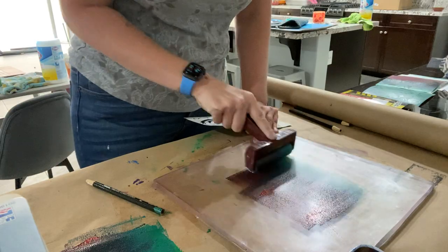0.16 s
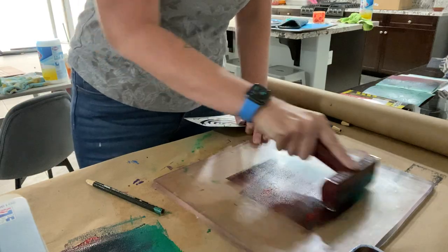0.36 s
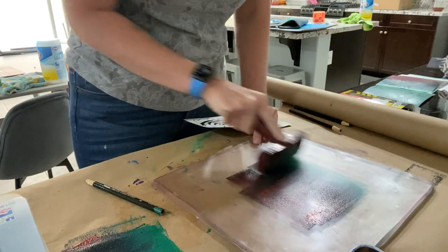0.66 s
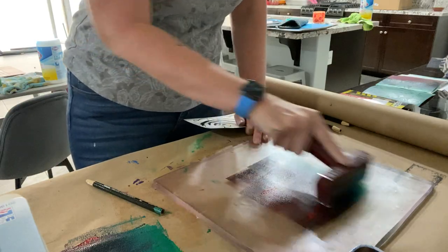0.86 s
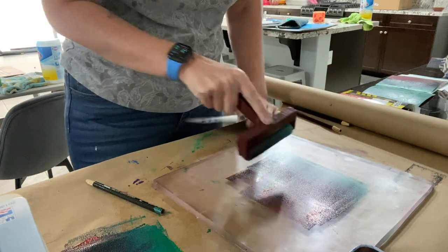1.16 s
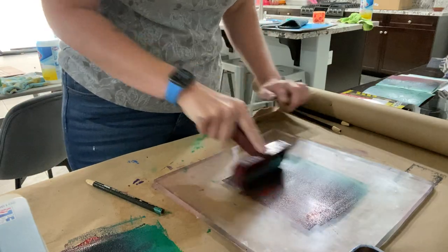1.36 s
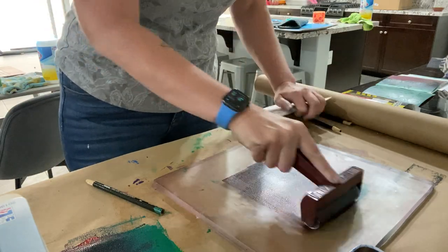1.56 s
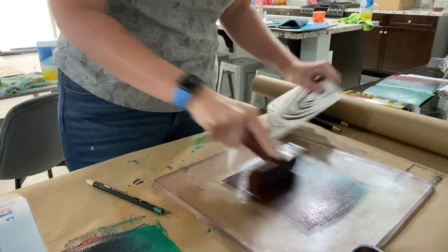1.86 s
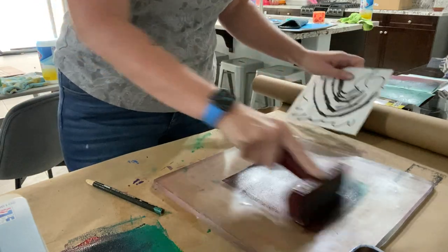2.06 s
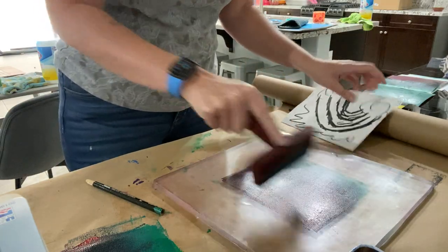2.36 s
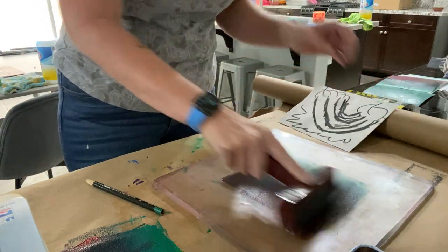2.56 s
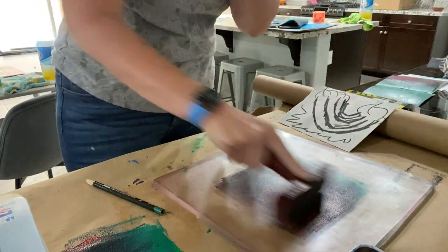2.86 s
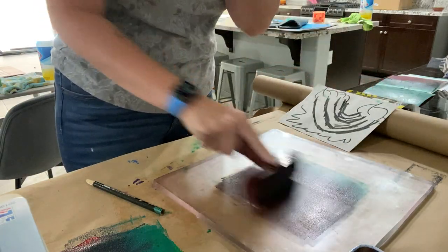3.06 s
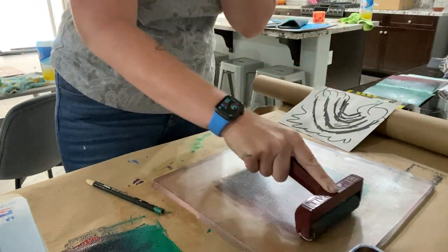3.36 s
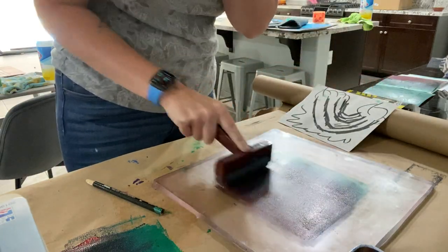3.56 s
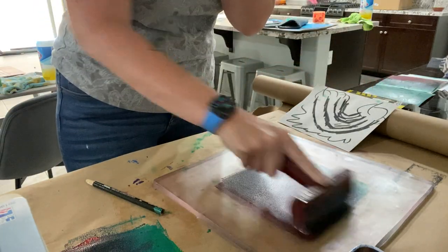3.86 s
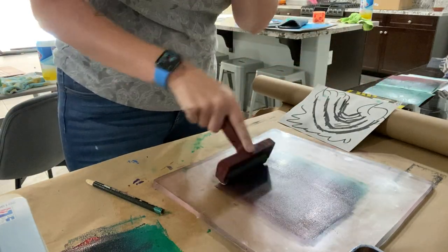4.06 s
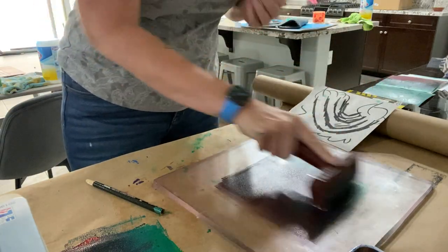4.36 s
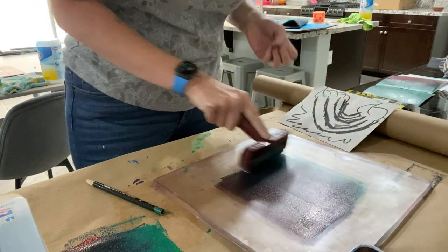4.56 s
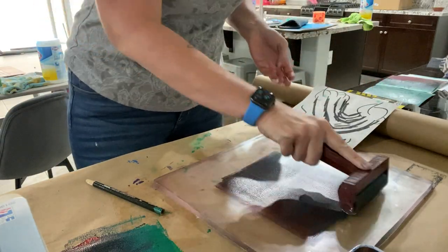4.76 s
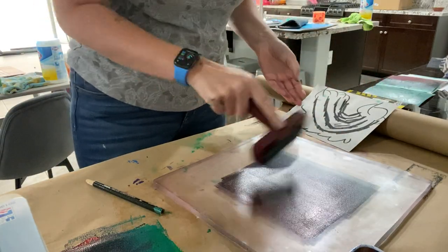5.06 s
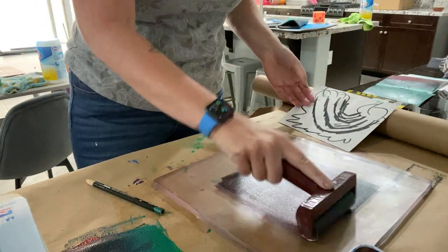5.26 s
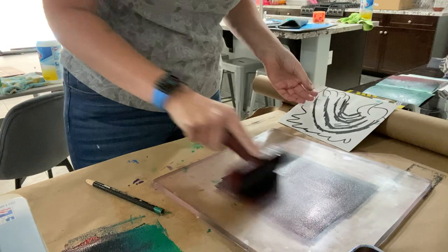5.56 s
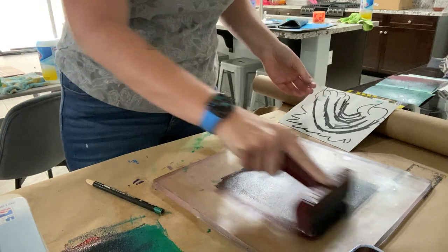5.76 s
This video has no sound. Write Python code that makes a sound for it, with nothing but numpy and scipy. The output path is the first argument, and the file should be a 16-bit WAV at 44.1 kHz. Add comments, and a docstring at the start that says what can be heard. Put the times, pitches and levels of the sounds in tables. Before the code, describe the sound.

Quick, sticky swishes of a roller spreading ink on a rumbling table, broken by light clicks and a few sharp knocks indoors.

```python
"""A fine hiss and a low rumble come and go as a rubber roller runs to and fro over tacky ink.
The ink tears, the rubber rasps and lumps shake a light table, which also carries the microphone.
Four times the roller is lifted, its axle clicks in the frame, and it lands with a crack and a thump.
The free hand rustles a paper sheet. A mains hum and a quiet, hard-walled room lie behind."""
import sys
import numpy as np
from scipy import signal
from scipy.fft import rfft, irfft, next_fast_len
from scipy.io import wavfile
from scipy.ndimage import map_coordinates

SR = 44100
rng = np.random.default_rng(int(sys.argv[2]) if len(sys.argv) > 2 else 0)


def output_pcm(signal):
    """Save a mono or channel-first signal as 16-bit PCM at the path in sys.argv[1].

    Samples are clipped to [-1, 1] before scaling.
    """
    pcm = np.clip(np.atleast_2d(signal).T, -1, 1) * 32767
    wavfile.write(sys.argv[1], SR, np.round(pcm).astype(np.int16))


N = 261072
LAG_S = 7.4 / SR  # the microphone's left side is further from the ink, so it hears it later

# The roller lands. Each row: time in seconds, crack level in dB, its main and lower pitch in Hz,
# left over right in dB, knock and thump levels in dB, thump pitch in Hz, seconds until it is damped.
LANDINGS = [(1.3923, -15.5, 3500, 2220, 1, -37.5, -16.5, 91, 0.039),
            (2.5933, -19.5, 3160, 2500, 9, -34.5, -5.5, 92.4, 0.032),
            (4.4051, -16, 3450, 1520, 4.5, -33, -5, 98, 0.026),
            (5.3424, -13, 3370, 1980, 7, -35.5, -12.5, 83, 0.15)]


def amp(db):
    return 10 ** (np.asarray(db) / 20)


def unit(x):
    return x / np.sqrt(np.mean(x ** 2) + 1e-20)


def along(points, hz):
    """Read between (Hz, value) points on a logarithmic pitch scale."""
    f, v = np.transpose(points)
    return np.interp(np.log(hz + 1), np.log(f + 1), v)


def wobble(rate):
    """A smooth random curve through `rate` points a second."""
    return map_coordinates(rng.standard_normal(int(N * rate / SR) + 4), [np.arange(N) * rate / SR])


def filtered(x, response):
    """Scale and delay each frequency of x by response(hz)."""
    size = next_fast_len(N + SR // 2)
    return irfft(rfft(x, size) * response(np.fft.rfftfreq(size, 1 / SR)), size)[..., :N]


def snaps(tone, spread_db, alike):
    """Noise of tiny, uneven snaps with a given tone; `alike` is the share both sides hear."""
    noise = rng.standard_normal((3, N)) * amp(spread_db * rng.standard_normal((3, N)))
    shared = filtered(noise[0], lambda hz: np.exp(-1j * np.pi * hz * LAG_S * np.array([[1], [-1]])))
    stereo = np.sqrt(alike) * shared + np.sqrt(1 - alike) * noise[1:]
    return unit(filtered(stereo, lambda hz: amp(along(tone, hz))))


def room(x):
    """The echo off hard walls: each frequency dies at its own speed."""
    # Each row: frequency in Hz, seconds for the echo to fade by 60 dB.
    walls = [(300, 0.8), (3000, 0.67), (5500, 0.45), (7500, 0.4), (10000, 0.29), (15000, 0.33)]
    hz, t, noise = signal.stft(rng.standard_normal((2, SR)), SR, nperseg=256)
    tail = signal.istft(noise * amp(-60 * t / along(walls, hz)[:, None]), SR, nperseg=256)[1]
    return signal.fftconvolve(np.pad(x, (250, 0))[None], tail / np.linalg.norm(tail[0]), axes=1)


def background():
    """Room air and a slightly unsteady mains hum."""
    # The air's tone. Each row: frequency in Hz, relative level in dB.
    air_tone = [(18, -42), (30, 8), (123, 8.5), (277, 4), (350, -0.5), (606, -10), (1290, -21.5),
                (1970, -20), (3400, -18.5), (4780, -25), (15500, -43)]
    # The hum. Each row: pitch in Hz, level in dB, left over right in dB, left's head start in radians.
    hum_tones = [(119.3, -46.5, -1, 0.059), (242, -58, -1, 0.18)]
    t, side = np.arange(N) / SR, np.array([[.5], [-.5]])
    out = amp(-52) * snaps(air_tone, spread_db=0, alike=0.74)
    for hz, db, pan_db, lead in hum_tones:
        level = amp(db + side * pan_db + 0.22 * wobble(13))
        out += level * np.sin(2 * np.pi * hz * t + side * lead + 0.47 * wobble(2.76))
    return out


def motion():
    """The hand swings the roller: its speed and nearness (0 to 1), and base dB for hiss and rasp."""
    # Each row: start of a stroke in seconds, direction (1 push, -1 pull), base hiss level in dB.
    strokes = [(-.14, -1, -50), (0.078, 1, -44.5), (0.287, -1, -49.5), (0.494, 1, -43), (0.712, -1, -49),
               (0.926, 1, -44.5), (1.394, -1, -51), (1.652, 1, -43.5), (1.88, -1, -50), (2.11, 1, -42),
               (2.6, 1, -43), (2.826, -1, -49.5), (3.038, 1, -42), (3.257, -1, -50), (3.462, 1, -41.5),
               (3.695, -1, -48.5), (3.92, 1, -44.5), (4.408, 1, -42), (4.64, -1, -48), (4.857, 1, -44.5),
               (5.344, 1, -43), (5.595, -1, -49.5), (5.82, 1, -43)]
    # The times in seconds when the roller leaves the ink.
    lifts = [1.182, 2.371, 4.19, 5.118]
    start, direction, ink_db = np.transpose(strokes)
    t, push = np.arange(N) / SR, direction > 0
    end = np.append(start[1:], start[-1] + 0.2)
    before_lift = np.searchsorted(start, lifts) - 1
    end[before_lift] = lifts
    lifted = np.isin(np.arange(len(start)), before_lift)
    landed = np.append(True, lifted[:-1])
    lean = np.select([lifted, landed, push], [-0.24, 0.32, -0.027], 0.0076)  # below 0: fastest early
    rasp_db = np.where(push & ~landed, -51, -50.5)  # a push presses harder just after a landing
    k = np.searchsorted(start, t, side="right") - 1  # the stroke under way
    progress = np.clip((t - start[k]) / (end - start)[k], 0, 1)
    swing = progress ** np.exp(lean[k]) * (1 - 0.05 * lifted[k])  # a lifted roller leaves still moving
    run_up, flatness = 0.092, 1.14  # share of the swing done before landing; how flat the top speed is
    swing = np.where(landed[k], run_up + (1 - run_up) * swing, swing)
    speed = np.tanh(flatness * np.abs(np.sin(np.pi * swing))) / np.tanh(flatness)
    speed *= np.clip((end[k] - t) / 0.0043, 0, 1)
    return speed, np.where(push[k], progress, 1 - progress), ink_db[k], rasp_db[k]


def ink_hiss(speed, nearness, db):
    """Ink threads snap behind the roller, louder the faster it runs."""
    # The hiss's tone. Each row: frequency in Hz, relative level in dB.
    ink_tone = [(1200, -37), (2400, -40), (3400, -10), (4600, -10), (6300, -2.5), (7500, -1.5), (8600, -1),
                (12000, -1.5), (15400, 0.4), (17000, -4)]
    hiss = snaps(ink_tone, spread_db=1.5, alike=1)
    # A copy bounces off the frame, later as the roller nears: the tone slides down on pushes, up on pulls.
    far_s, near_s = 0.000228, 0.000296
    delay = SR * (far_s + (near_s - far_s) * nearness)
    bounce = np.array([map_coordinates(side, [np.arange(N) - delay]) for side in hiss])
    return amp(db + 2.5 + 1.75 * wobble(40)) * speed ** 1.68 * (hiss + 0.5 * bounce)


def rubber_rasp(speed, db):
    """The rubber rasps over the soft, inked plate, with a low drag near top speed."""
    # The tones of rasp and drag. Each row: frequency in Hz, relative level in dB.
    rasp_tone = [(800, -13.5), (1200, -5), (1650, -12.5), (2300, -1), (3400, -5), (5000, -10), (8000, -9)]
    drag_tone = [(120, -3.5), (200, 4), (350, -6), (800, -8.5), (1200, -9), (1700, -27)]
    rasp = amp(db + 1.2 * wobble(25)) * speed ** 2.1 * snaps(rasp_tone, spread_db=3.5, alike=0.1)
    drag = amp(db - 2 + 1.95 * wobble(21.926)) * speed ** 4.8
    return rasp + drag * snaps(drag_tone, spread_db=5.5, alike=0.15)


def table_rumble(speed):
    """The uneven ink shakes the table under the moving roller; it shivers more after a landing."""
    # The table top's low notes. Each row: pitch in Hz, width in Hz, relative level in dB.
    notes = [(51, 24.5, -9.5), (74.6, 35.6, 3), (114, 28.8, 6.5), (162.2, 40, -3), (302, 70, -14.5)]

    def response(f):
        return sum((-1) ** k * amp(db) * 1j * f * width / (hz * hz - f * f + 1j * f * width)
                   for k, (hz, width, db) in enumerate(notes))

    t = np.arange(N) / SR
    shiver = sum((t > s) * amp(db - 36 - 60 * np.abs(t - s) / 1.1) for s, *_, db, _, _ in LANDINGS)
    lumps = rng.standard_normal((3, N)) * (amp(-45) + shiver) * amp(2.87 * wobble(25)) * speed ** 0.86
    shake = filtered(lumps[0] + amp(-18) * lumps[1:], response)
    twist = signal.lfilter(*signal.iirpeak(143, Q=4.5, fs=SR), lumps[1])
    return amp(24.5) * shake + amp(15.5) * twist * [[1], [-1]]  # a twist moves the sides opposite ways


def frame_blows(blows, length_s):
    """Each short rattle rings the roller's frame, most near its two pitches; the room answers."""
    # The frame's notes. Each row: pitch in Hz, relative level in dB, seconds to fade by 60 dB.
    notes = [(1060, -14, 0.0085), (1499, -4, 0.033), (1872, -8, 0.03), (2195, -1.5, 0.031),
             (2510, 2.5, 0.019), (2642, -2, 0.019), (3180, 3, 0.013), (3404, 6, 0.013), (3780, 3.5, 0.012),
             (4185, 5.5, 0.017), (4430, -2, 0.0082), (5450, 5, 0.011)]
    out, t = np.zeros((2, N + 3 * SR)), np.arange(SR // 25) / SR
    bright = signal.butter(1, [4500, 9000], "band", fs=SR, output="sos")
    thin = signal.butter(3, 900, "high", fs=SR, output="sos")
    hz, note_db, fade_s = np.transpose(notes)[..., None]
    fades = amp(note_db - 60 * t / fade_s)
    rings = fades * np.sin(2 * np.pi * hz * t)
    from_peak = t / length_s - 2
    rattle = np.exp(np.where(from_peak < 0, 2.5, -1.3) * from_peak)  # quick build-up, slower end
    swell = signal.fftconvolve(fades, rattle[None] ** 2.15, axes=1)[:, :len(t)]
    side_t = t - np.array([0.00008, 0])[:, None, None]  # the ring reaches the left side later
    for s, db, pitch_hz, lower_hz, treble_db, pan_db in blows:
        noise = rng.standard_normal((3, len(t)))
        octaves_away = np.abs(np.log2(hz / [pitch_hz, lower_hz]))
        weights = amp([0, -5.5] - 30 * octaves_away).max(axis=1)
        grit = signal.fftconvolve((noise[0] + 1.13 * noise[1:]) * rattle, (weights @ rings)[None], axes=1)
        cycles = hz * side_t + rng.random(hz.shape) + 0.074 * rng.standard_normal((2, *hz.shape))
        ring = weights @ (swell * np.sin(2 * np.pi * cycles))
        body = signal.sosfilt(thin, unit(ring) + amp(-4.5) * unit(grit[:, :len(t)]))
        treble = signal.sosfilt(bright, noise[0] * rattle ** 2)
        treble = np.array([np.roll(treble, round(LAG_S * SR)), treble])
        hit = amp(db + 5) * (body / np.abs(body).max() + amp(treble_db) * treble / np.abs(treble).max())
        # The walls mix sound from every direction, so the echo holds all the notes, slightly blurred.
        blurred = signal.sosfilt(thin, weights ** 0.9 @ rings * amp(-60 * t / 0.03))
        echo = amp(-9.5) * np.linalg.norm(hit[0]) * room(blurred / np.linalg.norm(blurred))
        at = SR + round((s - 1.2 * length_s) * SR)
        out[:, at:at + len(t)] += hit * amp([[pan_db / 2], [-pan_db / 2]])
        out[:, at:at + echo.shape[1]] += echo
    return out[:, SR:SR + N]


def axle_clicks():
    """The axle clicks in the roller's frame."""
    # Each row: time in seconds, level in dB, pitch in Hz, added treble in dB, left over right in dB.
    clicks = [(0.19, -45, 2030, -20, -1), (0.6107, -44.5, 2250, -10, 1), (1.145, -32, 3360, -10, -0.5),
              (1.1686, -39.5, 3430, -20, 1), (1.2564, -34.5, 3220, -13, -1), (1.327, -44, 2660, -26, 2),
              (2.3422, -30, 3030, -4.5, 1), (2.46, -34, 3240, 2.5, 0), (2.468, -40, 2640, -20, 3),
              (2.525, -45, 3200, -25, 2), (3.932, -48, 3200, 4, 2), (4.158, -37.5, 3080, -8, 0),
              (4.3236, -26.5, 4350, -19, 0), (4.334, -40, 3250, -25, -2), (5.0904, -26.5, 3350, -6.5, 3),
              (5.298, -47.5, 3000, -8, 0.5)]
    return frame_blows([(s, db, hz, hz, treble, pan) for s, db, hz, treble, pan in clicks], length_s=0.005)


def jolts():
    """The biggest lumps rock the table for a few cycles, with a shorter rubbery bump on top."""
    # Each row: start in seconds, level in dB, pitch in Hz.
    lumps = [(0.19, -29.5, 115), (0.367, -28.5, 139.5), (0.505, -28.5, 88.7), (0.94, -28.5, 88),
             (1.053, -31, 113), (3.088, -29.5, 93.6), (3.335, -31, 127), (3.518, -29.5, 88),
             (4.048, -27, 109), (4.178, -31, 86), (4.921, -33.5, 119), (5.008, -32.5, 97),
             (5.695, -31, 119.5), (5.86, -28.5, 84.5)]
    out, t = np.zeros(N + SR), np.arange(SR // 8) / SR
    for s, db, pitch_hz in lumps:
        rock = t / 0.016 * np.exp(1 - t / 0.011) * np.sin(2 * np.pi * pitch_hz * t)
        bump = t / 0.0089 * np.exp(1 - t / 0.0062) * np.sin(2 * np.pi * 2.84 * pitch_hz * t)
        out[round(s * SR):][:len(t)] += amp(db) * (rock + amp(-15.5) * bump)
    return out[:N]


def landing_cracks():
    """The frame cracks sharply as the roller lands."""
    earlier = (-0.12, -15.5, 3200, 2500, 0)  # a landing just before the start still hangs in the room
    treble_db = -4.5
    blows = [(s, db, hz, lower_hz, treble_db, pan) for s, db, hz, lower_hz, pan, *_ in [earlier, *LANDINGS]]
    return frame_blows(blows, length_s=0.0033)


def landing_thumps():
    """The table flexes with a sinking pitch, twists, gives a wooden knock and rings on."""
    out, t = np.zeros((2, N + SR)), np.arange(SR // 2) / SR
    woody = signal.butter(2, [380, 720], "band", fs=SR, output="sos")
    swell_s, after_crack_s = 0.013, 0.0057
    for s, *_, knock_db, db, pitch_hz, damped_s in LANDINGS:
        phase = 2 * np.pi * pitch_hz * (t + 0.0043 * (1 - np.exp(-t / 0.0037)))
        flex = t / swell_s * np.exp(1 - t / swell_s - (t / damped_s) ** 4) * np.sin(phase)
        ring = amp(-10 - 60 * t / 0.37) * (1 - np.exp(-(t / 0.052) ** 2)) * np.sin(2 * np.pi * 113 * t)
        twist = amp(-14 - 60 * t / 0.15) * (1 - np.exp(-t / swell_s)) * np.sin(2 * np.pi * 143 * t)
        thump = (flex + ring) * amp([[-.7], [.7]]) + twist * [[1], [-1]]
        knock = unit(signal.sosfilt(woody, rng.standard_normal((2, len(t)))))
        knock *= amp(-60 * t / 0.085) + amp(-18 - 60 * t / 0.5)
        out[:, round((s + after_crack_s) * SR):][:, :len(t)] += amp(db) * thump + amp(knock_db) * knock
    return out[:, :N]


def paper_rustle():
    """A stiff sheet crackles softly as it is picked up and laid down."""
    # The rustle's rise and fall. Each row: time in seconds, level in dB.
    levels = [(1.439, -49), (1.51, -57), (1.57, -43.5), (1.66, -58.5), (2.14, -60.5), (2.2, -49.5),
              (2.33, -45.5), (2.39, -52.5), (2.43, -49), (2.52, -47), (2.593, -55.5)]
    # The paper's tone. Each row: frequency in Hz, relative level in dB.
    paper_tone = [(200, -5), (400, -4.5), (700, -7.5), (1100, -7), (1500, -15.5), (3000, -10),
                  (7500, -20.5), (12000, -32)]
    db = np.interp(np.arange(N) / SR, *np.transpose(levels), left=-120, right=-120)
    return amp(db + 2 * wobble(30.18)) * snaps(paper_tone, spread_db=7.5, alike=0.3)


def scene():
    speed, nearness, ink_db, rasp_db = motion()
    roller = ink_hiss(speed, nearness, ink_db) + rubber_rasp(speed, rasp_db)
    rolling = roller + table_rumble(speed) + amp(-11.5) * room(roller[0])[:, :N]
    handling = jolts() + paper_rustle() + landing_cracks() + axle_clicks() + landing_thumps()
    return rolling + handling + background()


def record(dry):
    """Cut away the highest treble; nothing is left above 15850 Hz."""
    return filtered(dry, lambda hz: np.clip((15850 - hz) / 300, 0, 1) ** 2)


dry = scene()
out = record(dry)
output_pcm(out)
```